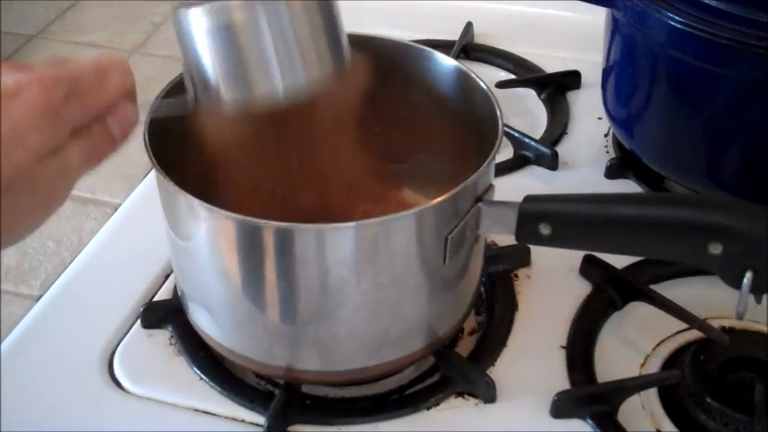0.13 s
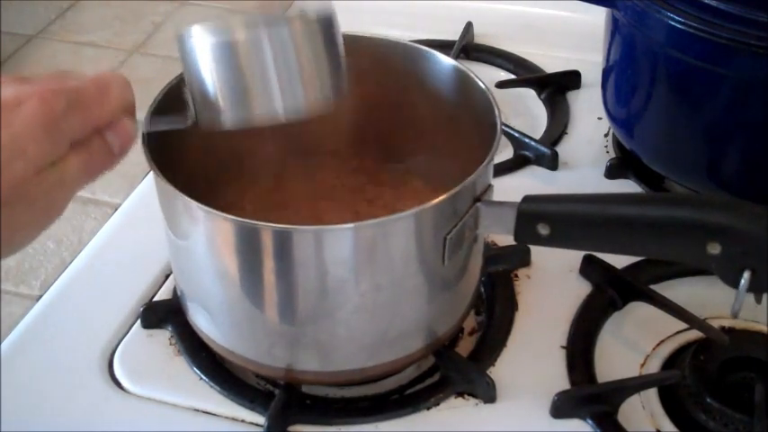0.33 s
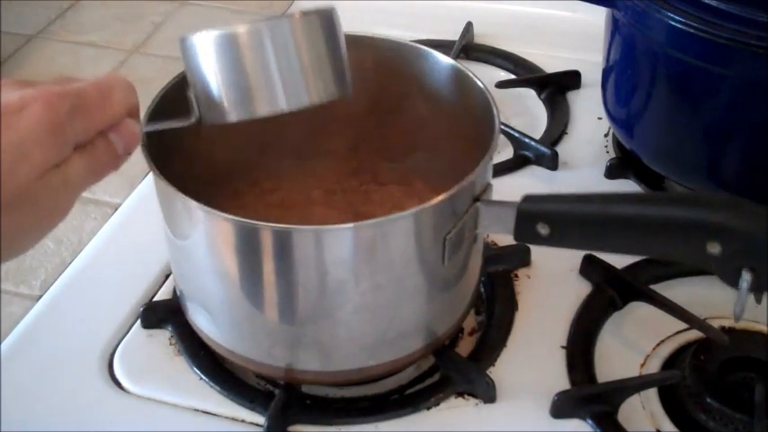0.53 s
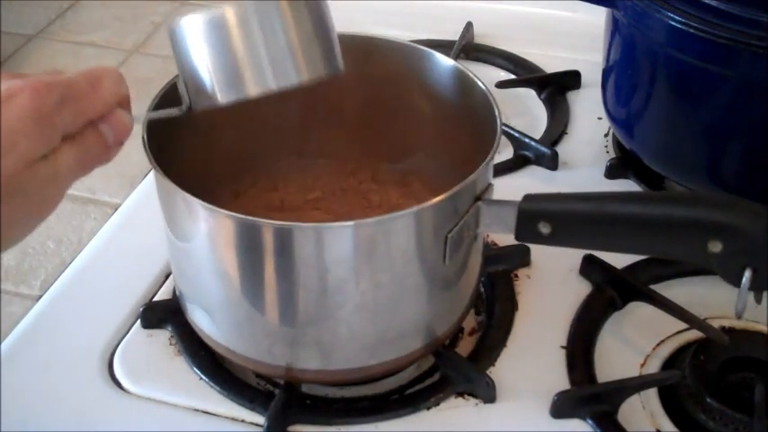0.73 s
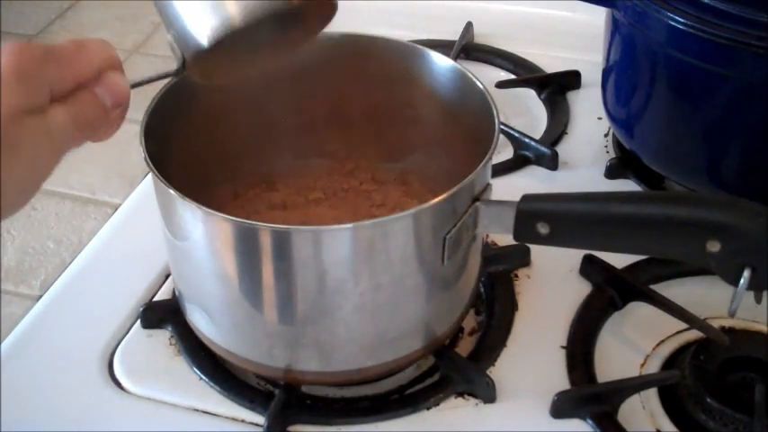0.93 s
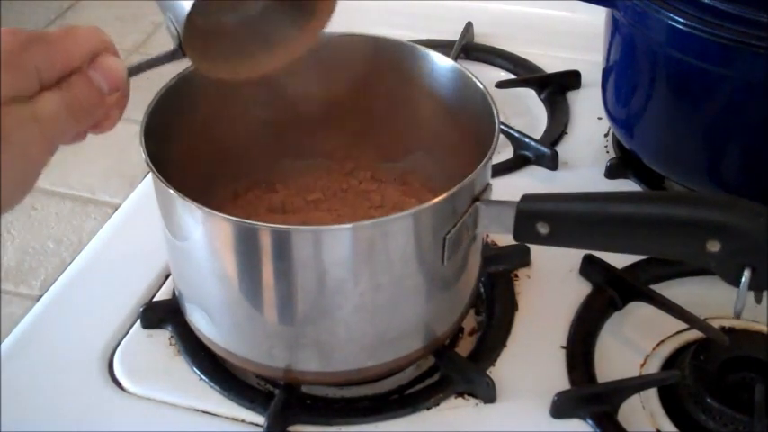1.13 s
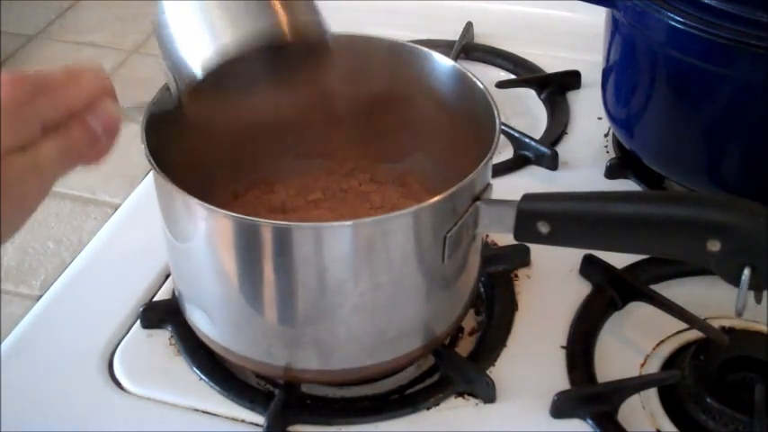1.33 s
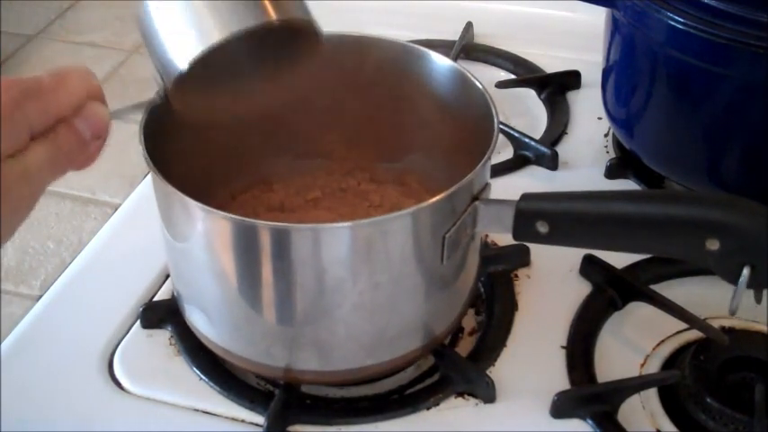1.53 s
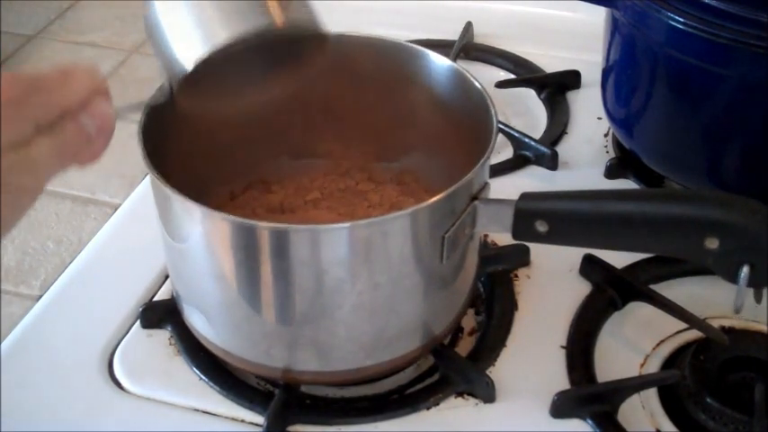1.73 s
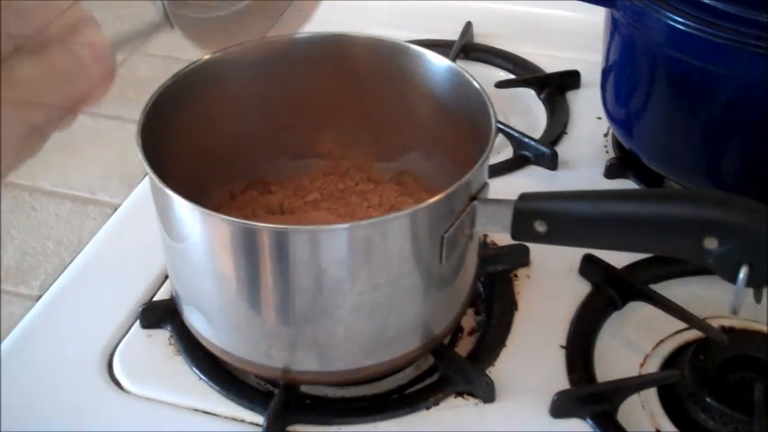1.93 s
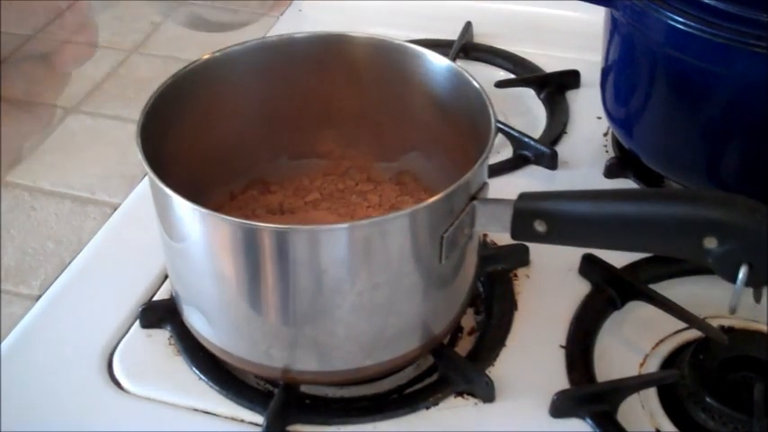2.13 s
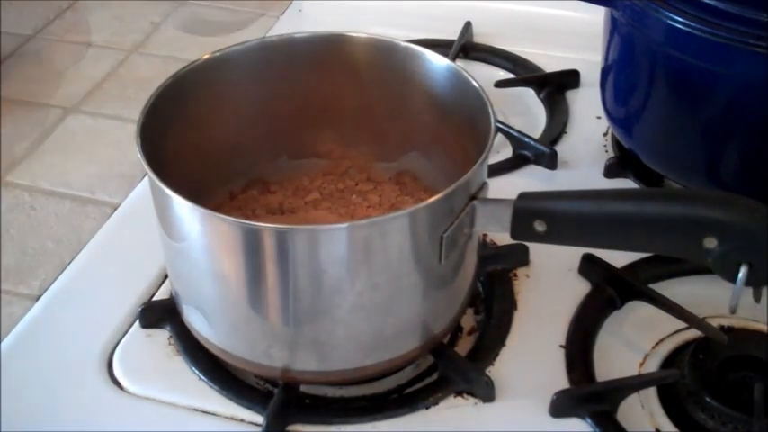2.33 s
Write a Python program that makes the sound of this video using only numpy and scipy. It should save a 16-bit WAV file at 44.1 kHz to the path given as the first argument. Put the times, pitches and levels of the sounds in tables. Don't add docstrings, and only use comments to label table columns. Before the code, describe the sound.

Sharp ringing spoon taps on a metal measuring cup, with powder sliding out, in a quiet kitchen

```python
import sys
import numpy as np
from scipy import signal
from scipy.fft import rfft, irfft, next_fast_len
from scipy.io import wavfile
from scipy.ndimage import uniform_filter1d

SR = 44100
rng = np.random.default_rng(int(sys.argv[2]) if len(sys.argv) > 2 else 0)


def waveform_to_disk(signal):
    frames = np.transpose(np.atleast_2d(signal))
    scaled = np.clip(frames, -1, 1) * 32767
    samples = np.round(scaled).astype(np.int16)
    wavfile.write(sys.argv[1], SR, samples)


def level_to_linear(level):
    exponent = np.asarray(level, float) / 20
    return 10 ** exponent


N = 109147


def noise(length):
    return rng.standard_normal(length)


def evened(x):
    return x / np.sqrt(np.mean(x ** 2) + 1e-20)


def wobble(length, smooth):
    return evened(uniform_filter1d(noise(length), size=smooth))


def read(points, hz):
    f, value = np.transpose(points)
    return np.interp(np.log(hz + 1), np.log(f + 1), value)


def add(mix, s, sound):
    at = round(s * SR)
    part = mix[max(at, 0):][:len(sound) + min(at, 0)]
    part += sound[max(-at, 0):][:len(part)]


def shaped(x, points):
    hz = np.fft.rfftfreq(len(x), 1 / SR)
    return irfft(rfft(x) * level_to_linear(read(points, hz)), len(x))


def coloured(x, points):
    return evened(shaped(x, points))


def resonate(x, hz, width):
    turn = np.exp(2j * np.pi * hz * np.arange(len(x)) / SR)
    r = np.exp(-np.pi * width / SR)
    return 2 * (turn * signal.lfilter([1 - r], [1, -r], x / turn)).real


def modes(table, t, spread_db, twist=1.0):
    hz, db, t60 = np.transpose(table)[:, :, None]
    luck = rng.standard_normal((len(table), 2))
    level = level_to_linear(db + spread_db * luck[:, :1] - 60 * t / abs(t60))
    return (level * np.sin(2 * np.pi * hz * t + twist * luck[:, 1:])).sum(0)


# pitch in Hz, level in dB.
AIR_COLOUR = [(15, -66.5), (25, -42.5), (231, -6), (301, -10.5), (691, -9), (1180, -15.5), (3500, -23.5),
              (6540, -21), (14500, -43.5)]
# pitch in Hz, width in Hz, level in dB.
APPLIANCE_HUM = [(187.3, 23, -81), (222.7, 9.5, -59.5), (387, 25, -60.5), (6400, 2700, -71.5)]
# pitch in Hz, side level against the middle in dB.
AIR_WIDTH = [(60, -20), (300, -25.5), (1400, -6.5), (3500, 0.5), (5000, -8.5), (15000, -2.5)]


def air():
    layers = []
    for _ in range(2):
        hum = sum(level_to_linear(db) * evened(resonate(noise(N), hz, width)) for hz, width, db in APPLIANCE_HUM)
        layers.append(level_to_linear(-53) * coloured(noise(N), AIR_COLOUR) + hum)
    mid, side = layers[0], shaped(layers[1], AIR_WIDTH)
    return np.array([mid + side, mid - side])


# pitch in Hz, seconds to fall by 60 dB.
ECHO_FADE = [(200, 0.96), (1000, 0.15), (4000, 0.18), (10000, 0.36)]


def kitchen(x):
    echoes = np.zeros((2, SR // 2))
    at = np.arange(200, SR // 2 - 20, 20)
    at = at + rng.integers(0, 20, (2, len(at)))
    np.put_along_axis(echoes, at, rng.choice([-1., 1.], at.shape), 1)
    hz, t, z = signal.stft(echoes, SR, nperseg=256)
    fade = level_to_linear(-60 * t / read(ECHO_FADE, hz)[:, None])
    tail = signal.istft(z * fade, SR, nperseg=256)[1]
    return signal.fftconvolve(x[None], tail / np.linalg.norm(tail[0]), axes=1)[:, :N]


# start in seconds, level in dB, rise in seconds, seconds to fall by 60 dB.
SLIDES = [(-.05, -30.5, 0.063, 0.34), (0.063, -27.5, 0.0051, 0.42), (0.188, -22.5, 0.011, 1),
          (.34, -21, 0.04, 0.2), (0.511, -21.5, 0.039, 0.21), (.625, -27, 0.002, 0.19),
          (0.668, -19, 0.043, 0.47), (0.829, -18, 0.04, 0.33), (0.888, -24, 0.082, 0.29),
          (1.408, -19.5, 0.041, 0.35), (1.52, -30.5, 0.028, 0.33), (1.598, -21, 0.013, 0.64),
          (1.779, -29, 0.024, 0.41), (1.87, -35.5, 0.04, 0.2)]


def flow():
    t, power = np.arange(SR) / SR, np.zeros(N)
    for s, db, rise, t60 in SLIDES:
        swell = np.sin(np.pi / 2 * np.minimum(t / rise, 1)) ** 4
        add(power, s, level_to_linear(2 * db - 120 * np.maximum(t - rise, 0) / t60) * swell)
    return power


# pitch in Hz, level in dB.
RUMBLE_COLOUR = [(20, -30), (45, -20), (80, -0.5), (130, -10), (250, -41.5)]


def rumble():
    r = np.exp(-1 / (0.13 * SR))
    shake = np.sqrt(signal.lfilter([1 - r], [1, -r], flow()) ** .5 * 0.011)
    a, b = (coloured(noise(N), RUMBLE_COLOUR) for _ in range(2))
    return level_to_linear(-38 + 13.5) * shake * np.array([a, 0.32 * a + 0.59 * b])


# pitch in Hz, level in dB.
POWDER_COLOUR = [(60, -32), (200, -8.5), (1100, -4), (3420, -9.5), (7000, -4.5), (9300, -18.5),
                 (11000, -35), (11700, -42), (14600, -56)]
# pitch in Hz, width in Hz, level in dB.
SINGING = [(6320, 260, -13.5), (7534, 200, -13), (345.4, 136, -15.5)]


def powder():
    grains_per_s, spread_db, grain_db = 4000, 4.5, 0.5
    size = level_to_linear(spread_db * np.minimum(rng.exponential(1, N), 5))
    size = size * (rng.random(N) < grains_per_s / SR)
    puffs = evened(signal.lfilter([1], [1, -np.exp(-1 / (0.0049 * SR))], size) * noise(N))
    drive = noise(N) + level_to_linear(grain_db) * puffs
    sing = np.zeros(N)
    for hz, width, db in [*SINGING, (13680, 300, -33)]:
        sing += level_to_linear(db) * evened(resonate(resonate(drive, hz, width), hz, width))
    return np.sqrt(flow()) * (coloured(drive, POWDER_COLOUR) + sing)


# time in
# seconds, level in dB, pitch in Hz.
TICKS = [(0.206, -8.5, 2720), (0.2171, -6.5, 7040), (0.24, -5.5, 6200), (0.246, -7, 6460),
         (0.2517, -33.5, 6250), (0.309, -25, 1200), (0.352, -7, 6300), (0.3667, -4.5, 6550),
         (0.484, -13.5, 6360), (0.537, -10, 5900), (0.625, -16.5, 5500), (0.6894, -8, 6000),
         (0.71, -12.5, 6400), (0.7186, -9.5, 7500), (0.748, -13, 6320), (0.7766, -22, 6320),
         (0.8378, -5.5, 4670), (0.8844, -14.5, 7460), (0.9118, -5.5, 6320), (0.9266, -5, 7750),
         (1.411, -19, 7930), (1.4295, -19.5, 6240), (1.4495, -17, 6400), (1.545, -44.5, 6300),
         (1.611, -22, 6300), (1.611, -11.5, 2230), (1.6214, -13, 6500), (1.634, -16, 7760),
         (1.881, -21, 2280)]
# pitch in Hz, level in dB.
TICK_DULL = [(300, -24), (1500, -8), (4000, -18), (7000, -9), (9300, -19.5), (11200, -34), (14600, -84.5)]


def ticks():
    rise_s, t60, level_db = .0015, 0.054, -13
    out, t = np.zeros(N), np.arange(3000) / SR
    rise = np.sin(np.pi / 2 * np.minimum(t / rise_s, 1)) ** 2
    for s, db, hz in TICKS:
        burst = evened(resonate(resonate(noise(len(t)), hz, 820.0), hz, 820.0))
        burst = burst + 0.61 * coloured(noise(len(t)), TICK_DULL)
        add(out, s, level_to_linear(db + level_db - 60 * t / t60) * burst * rise)
    return out


def knock(hz, db, t60):
    t = np.arange(SR // 4) / SR
    rough = 1 + 0.85 * wobble(len(t), 200) * np.minimum(t / 0.014, 1)
    return modes([(hz, db, t60)], t, 0, 0) * rough


# pitch in Hz, level in dB.
CRACK_COLOUR = [(88, -50), (150, -18), (1220, -7.5), (2650, -11.5), (4560, -8.5), (5120, -4.5), (5980, 5),
                (13500, -25), (15500, -36.5)]


def crack_and_shake(t):
    fade = level_to_linear(-60 * t / 0.011) + level_to_linear(-13 - 60 * t / 0.068)
    crack = coloured(noise(len(t)), CRACK_COLOUR) * fade
    return crack + level_to_linear(-19.5 - 60 * t / 0.24) * coloured(noise(len(t)), POWDER_COLOUR)


def ring_tone(t, ring_hz, twin_hz, twin_db, t60, build_s):
    ring = modes([(ring_hz, 0, t60), (twin_hz, twin_db, 0.35)], t, 0, 0)
    ring = ring * (1 - np.exp(-(t / build_s) ** 2))
    early = 1 + 1.1 * np.exp(-t / 0.012)
    return ring * early * (1 + 0.087 * wobble(len(t), 400))


# pitch in Hz, level in dB, seconds to fall by 60 dB.
BODY = [(319, -21, 0.56), (350, -30, 0.27), (1040, -21.5, 0.07)]
# level in dB, seconds to fall by 60 dB.
OVERTONES = [(-36, 0.18), (-27.5, 0.23), (-32, 0.54), (-28.5, 0.087), (-13, 0.12), (-34, .06), (-14.5, .06),
             (-16, 0.055), (-15.5, 0.029), (-4, 0.028), (-36, 0.1), (-16, 0.1), (-16.5, 0.081),
             (-15, 0.044)]
CUP_HZ = 2180, 3855, 4745, 5500, 5700, 5832, 5988, 6125, 6330, 6842, 7335, 7480, 7995, 9080
TURNED_HZ = 2340, 3180, 3500, 4430, 5700, 5700, 6000, 6110, 6300, 6690, 7335, 7165, 7780, 8960
SPOT_HZ = 4603, 2322, 755
RIM_HZ = (3855, 5990, 6845, 4745)
TURNED_RIM_HZ = (3855, 5900, 7250, 4800)
RIM_T60 = 0.15, .05, 0.031, 0.041


def tap(s, crack_db, ring_db, body_db, t60, build_s, over_db, thump_db, ring_hz, twin_hz, twin_db, *spot_db):
    t = np.arange(SR // 2) / SR
    crack = crack_and_shake(t)
    ring = ring_tone(t, ring_hz, twin_hz, twin_db, t60, build_s)
    turned = s > 1.2
    spot_hz = [*SPOT_HZ, *(TURNED_RIM_HZ if turned else RIM_HZ)]
    spot = modes(np.transpose([spot_hz, spot_db, [0.053, 0.58, 0.026, *RIM_T60]]), t, 0)
    over = modes(np.column_stack([TURNED_HZ if turned else CUP_HZ, OVERTONES]), t, 0.83)
    rattle = 1 + 0.45 * evened(uniform_filter1d(rng.standard_normal((2, len(t))), size=60))
    spot = spot * (2 + rattle[0]) / 3
    over = over * rattle[1]
    thump = np.sin(2 * np.pi * 70 * t) * np.exp(-t / 0.0034) * np.minimum(t / 0.0023, 1)
    blow = level_to_linear(crack_db) * crack + level_to_linear(over_db) * over + level_to_linear(ring_db) * ring + spot
    blow = blow + level_to_linear(body_db) * modes(BODY, t, 4.0) + level_to_linear(thump_db + 8.5) * thump
    return blow * np.minimum(t / .0002, 1)


# time in seconds, crack, ring and dull body in dB, seconds for the ring to fall 60 dB.
TAPS = [
    (0.0598, -10, -36, -13, 0.59),
    (0.1472, -3, -11.5, -15, 0.28),
    (0.3169, -4.5, -16, -24, 0.29),
    (0.4903, -6.5, -17, -20, 0.38),
    (0.6423, -1.5, -16, -23, 0.35),
    (0.8103, -6.5, -12, -8, 0.3),
    (1.3828, 3.5, -5.5, -14.5, 0.18),
    (1.5833, -1.5, -8, -17, 0.17),
    (1.76, -3.5, -8.5, -17.5, 0.2),
]
# seconds for the ring to build up, long overtones in dB, air thump in dB.
GRIP = [(0.0063, -5.5, -64), (0.011, -6, -45), (0.0087, -2.5, -43.5), (0.01, -3, -52.5), (.013, 1.5, -30.5),
        (0.0057, -1.5, -65), (0.0014, -17, -26), (0.0078, -9.5, -50), (0.0026, -18.5, -45.5)]
# pitch in Hz, pitch of its slower twin in Hz.
RING_HZ = [(1186, 1194)] + [(1196, 1188)] + 4 * [(1179, 1187)] + 3 * [(1189, 1182)]
# twin level in dB, then three spot tones in dB.
SPOT = [(-19, -25.5, -54, -44.5), (-33.5, -27, -37.5, -54), (-20, -11, -38, -46), (-11.5, -12.5, -52, -34),
        (-9.5, -6.5, -33, -56), (-16.5, -11.5, -32, -37.5), (-16, -5.5, -33.5, -2.5),
        (-18.5, -43.5, -31, -11.5), (-13, -21.5, -31.5, -13.5)]
RIM = [(-53, -11.5, -27, -42), (-42.5, -10, -27, -41), (-23, -16, -21.5, -42), (-34, -8.5, -21, -35),
       (-35.5, -9, -31, -36), (-33.5, -6.5, -30.5, -31.5), (-22, -26, -25, -34), (-23, -32, -9.5, -32),
       (-31.5, -22, -26, -39)]
# pitch in Hz, level in dB, seconds to fall by 60 dB.
KNOCK = [(598, -33, 0.29), (605.4, -19, 0.15), (608, -20.5, 0.16), (618, -15.5, 0.1), (578, -15.5, 0.072),
         (585, -17.5, 0.081), (678, -14, 0.059), (618, -14, .05), (624, -18, 0.066)]


def spoon():
    out = np.zeros(N)
    for row, grip, ring, spot, rim, dull in zip(TAPS, GRIP, RING_HZ, SPOT, RIM, KNOCK):
        add(out, row[0], tap(*row, *grip, *ring, *spot, *rim))
        add(out, row[0], knock(*dull))
    return out


# pitch in Hz, side level against the middle in dB.
SIDE_DB = [(60, -7.5), (330, -34.5), (1170, -11), (2000, -5), (4000, -3.5), (6400, -4.5), (15000, -7.5)]
# pitch in Hz, left level against right in dB.
LEAN = [(25, 11.5), (140, -2), (500, 1), (6000, -1), (9000, 15.5), (15000, 17.5)]


def ports(x):
    t, size = np.arange(N) / SR, next_fast_len(N + 512)
    fine = signal.resample_poly(x, up=4, down=1)
    delay_s = .0006 + .00012 * np.sin(2 * np.pi * 2.3 * t)
    late = np.interp(t - delay_s, np.arange(len(fine)) / (4 * SR), fine)
    hz = np.fft.rfftfreq(size, 1 / SR)
    both = rfft(x, size) + np.outer([1, -1], level_to_linear(read(SIDE_DB, hz)) * rfft(late, size))
    return irfft(both * level_to_linear(np.outer([.5, -.5], read(LEAN, hz))), size)[:, :N]


def scene():
    blows = spoon()
    dust = 0.65 * powder() + ticks()
    spread = np.array([powder(), powder()])
    soft = ports(dust) + 0.277 * level_to_linear(np.array([[1.], [-1.]])) * spread
    soft = soft + level_to_linear(-17.5) * kitchen(blows + dust) + air()
    no_top = signal.butter(16, 14300, fs=SR, output="sos")
    return ports(blows) + signal.sosfilt(no_top, soft) + rumble()


def roll_off(x):
    return signal.sosfilt(signal.butter(12, 15610, fs=SR, output="sos"), x)


def record(dry):
    x = level_to_linear(1.5) * dry
    x = x / (1 + abs(x) ** 6.0) ** (1 / 6.0)
    x = signal.sosfilt(signal.butter(10, 15000, fs=SR, output="sos"), x)
    return roll_off(x)


dry = scene()
out = record(dry)
waveform_to_disk(out)
```